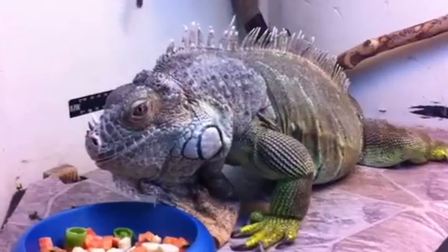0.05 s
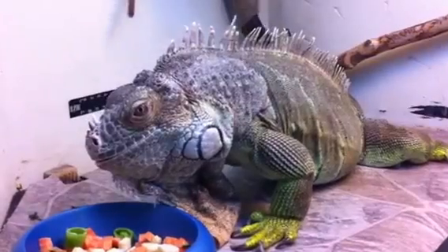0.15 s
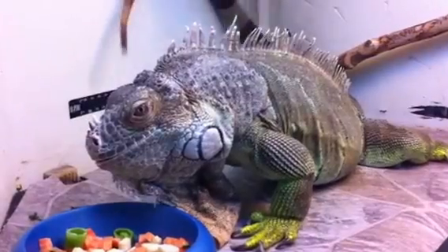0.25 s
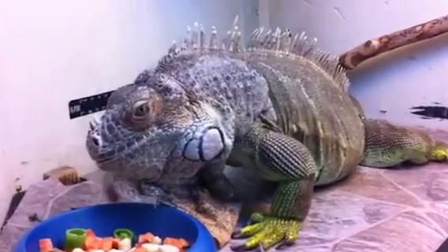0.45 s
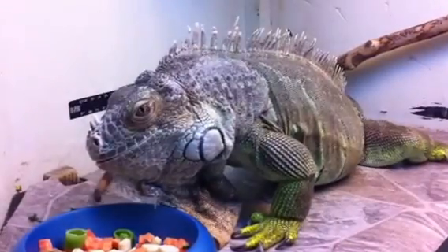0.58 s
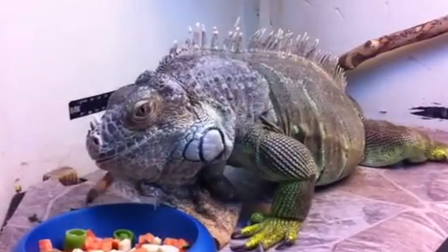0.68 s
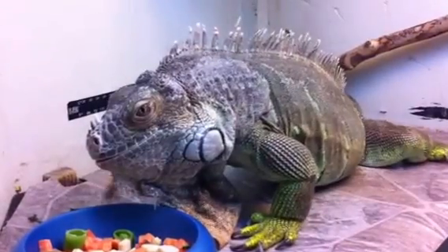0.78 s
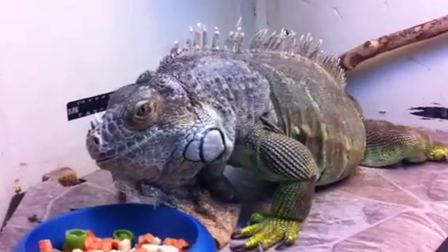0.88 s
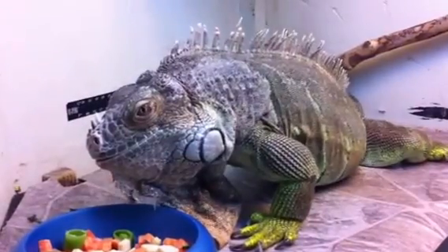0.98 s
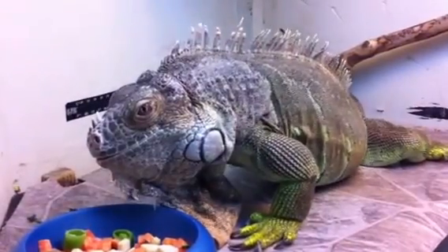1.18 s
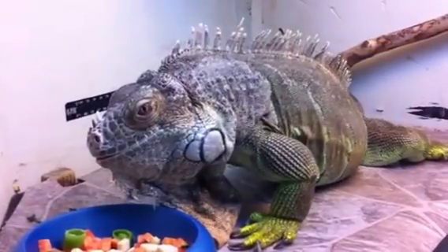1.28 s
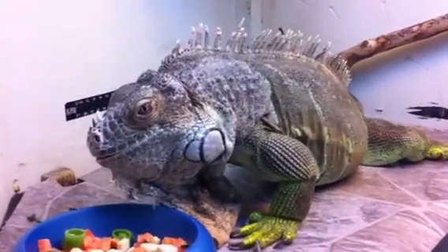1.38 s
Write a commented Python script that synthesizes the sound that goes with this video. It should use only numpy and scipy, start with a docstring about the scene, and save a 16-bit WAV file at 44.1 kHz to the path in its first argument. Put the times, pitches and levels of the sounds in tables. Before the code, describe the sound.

Close to the microphone, a reptile's tail scrapes down a wall panel with low bumps and a sharp click. Soft shuffling and a dull thud come afterwards, over a small room's low hum and slight hiss.

```python
"""A small room, one microphone close to an iguana's enclosure.
The scaly tail slides down the wall, faster and faster, snags a few times and stops. The scales rasp
as they stick and slip, and the wall panel rumbles and knocks under them. Faint shuffles and a padded
thud follow. Further off the room hums, and the microphone adds a little hiss."""
import sys
import numpy as np
from scipy import signal
from scipy.fft import rfft, irfft
from scipy.io import wavfile
from scipy.ndimage import uniform_filter1d

SR = 44100
rng = np.random.default_rng(int(sys.argv[2]) if len(sys.argv) > 2 else 0)


def persist_wave(psi):
    """Save psi, clipped to +-1, as 16-bit WAV."""
    counts = np.round(np.clip(psi, -1, 1) * 32767).astype(np.int16)
    wavfile.write(sys.argv[1], SR, np.atleast_2d(counts).T)


N = 63945
T = np.arange(N) / SR

# hum of the room: f/Hz, relative density/dB
HUM_SPECTRUM = [(25, -22), (60, -35), (100, -13), (130, 1), (200, -15), (290, 2.5), (400, -10.5), (520, -6),
                (700, -16), (1500, -19), (4000, -21.5), (9000, -22.5)]
# hiss of the microphone: f/Hz, relative density/dB
HISS_SPECTRUM = [(2000, -17.5), (7000, -17), (10500, -16.5), (12500, -9), (14300, -10), (15100, -0.5),
                 (15900, -10.5)]
# rasp of the tail on the wall: t/s, level/dB
RASP_LEVELS = [(.09, -71), (.17, -65), (.235, -55.5), (.34, -55.5), (.43, -52.5), (.51, -49), (.56, -45.5),
               (.595, -46.5), (.628, -47.5), (.672, -47.5), (.72, -56.5), (.79, -71.5)]
# rasp of the scales: f/Hz, relative density/dB
RASP_SPECTRUM = [(60, -11), (300, 6.5), (480, -24), (680, -0.5), (850, 3), (1500, -3), (2400, -2),
                 (3400, -3.5), (4400, -7), (7000, -11), (11000, -10), (15800, -19.5)]
# push of the tail on the panel: t/s, level/dB
PUSH_LEVELS = [(.15, -57), (.225, -52), (.29, -50), (.39, -46), (.465, -42), (.55, -39.5), (.585, -44),
               (.65, -35.5), (.69, -42.5), (.735, -68.5), (.82, -60)]
# modes of the wall panel, with two long-ringing room modes at 273 and 528 Hz: f/Hz, share rubbed high up/dB,
# share rubbed low down/dB, t60/s
PANEL_MODES = [(132.2, 4, -4.5, 0.78), (164.8, -6.5, -3, 0.19), (207.3, -1, -4.5, 0.15),
               (245.5, -5, -1, 0.32), (273, -15.5, -5.5, 0.56), (332.2, -2.5, -5, 0.17),
               (378.2, -7.5, -3, 0.18), (405.34, -2, -3.5, 0.43), (478.6, -14, -5, 0.14),
               (528, -17.5, -8, 0.3), (599, -15.5, -13, 0.043), (850, -35, -12, 0.016)]
# echo of the room: f/Hz, relative density/dB
ECHO_SPECTRUM = [(150, -5), (270, -1), (450, 0), (700, 14), (1000, 0.5), (1500, 4.5), (4000, -3),
                 (9000, -13)]
# tail and body bumping the panel: t/s, level/dB, f/Hz
PANEL_BUMPS = [(.225, -38, 132.5), (0.308, -36.5, 152), (0.369, -38.5, 134.3), (.386, -32.5, 134.6),
               (.449, -39.5, 398.6), (0.488, -35, 390.6), (.518, -34, 144), (.607, -37, 156.6),
               (.647, -37, 379), (.673, -28.5, 136), (0.705, -35.5, 136.4), (1.412, -53, 150)]
# scales catching on the wall: t/s, level/dB, decay/s, tilt/(dB per octave)
SCALE_SNAGS = [(0.5501, -44, 0.011, -3.5), (.6054, -40, 0.0067, 2.5), (0.6113, -43, 0.0069, -7),
               (0.6371, -40.5, 0.0088, -5), (0.6379, -36, 0.01, 0.7), (0.666, -47.5, 0.013, 5)]
# scratch of a snag or flick: f/Hz, relative density/dB
SCRATCH_SPECTRUM = [(80, -23), (350, -3), (900, 3.5), (1450, 7.5), (2100, 1.5), (3500, 1.5), (5000, -7),
                    (9000, -8), (15800, -16.5)]
# faint shuffles: peak t/s, rise/s, fall/s, rasp level/dB, push level/dB
SHUFFLE_SWELLS = [(.957, 0.021, 0.026, -61.5, -61), (1.013, 0.033, 0.042, -69, -65.5),
                  (1.097, 0.036, 0.058, -63, -62), (1.371, 0.032, 0.031, -63, -63.5),
                  (1.42, .013, 0.036, -65, -77)]
# rasp of the shuffles: f/Hz, relative density/dB
SHUFFLE_SPECTRUM = [(80, -12), (140, 21), (290, 2), (420, -16), (800, 4.5), (1300, -1.5), (2700, -4),
                    (3060, 2.5), (3500, -4.5), (7000, -9), (15800, -21)]
# body of the thud: f/Hz, relative density/dB
THUD_SPECTRUM = [(90, -20), (150, 3), (290, 1), (450, -18), (900, -13), (1400, -24.5), (5000, -32)]


def undb(db):
    """Decibels to gain."""
    return 10 ** (np.asarray(db) / 20)


def unit(x):
    """Scale to rms 1."""
    return x / np.sqrt(np.mean(x ** 2))


def fader(rows):
    """Gain from points of t/s, level/dB; silent outside them."""
    times, db = np.array(rows).T
    return undb(np.interp(T, times, db, left=-np.inf, right=-np.inf))


def colour(x, spectrum, tilt=0):
    """Shape by points of f/Hz, level/dB and a tilt in dB per octave; rms 1."""
    hz, db = np.array(spectrum).T
    octave = np.log2(np.maximum(np.fft.rfftfreq(N, 1 / SR), 1))
    gain = undb(np.interp(octave, np.log2(hz), db + tilt * np.log2(hz)))
    return unit(irfft(rfft(x) * gain, N))


def waver(rate_hz):
    """Glide between random values; rms 1."""
    hold = int(SR / rate_hz)
    steps = np.repeat(rng.standard_normal(N // hold + 1), hold)
    return unit(uniform_filter1d(steps, hold)[:N])


def die_away(t60):
    """A fade that loses 60 dB in t60 seconds."""
    return np.exp(-np.log(1000) * T / t60)


def resound(x, response):
    """Pass x through an impulse response scaled to unit energy."""
    return signal.fftconvolve(x, response / np.linalg.norm(response))[:N]


def low_cut(x, hz=130.3, order=8):
    """Roll off the bass, by default steeply below the panel's lowest mode."""
    return signal.sosfilt(signal.butter(order, hz, "high", fs=SR, output="sos"), x)


def background(hum_db=-61.5, waver_db=-0.47, hiss_db=-65.5):
    """The room's low, slightly wavering hum and the microphone's steady hiss."""
    hum = colour(rng.standard_normal(N), HUM_SPECTRUM) * undb(hum_db + waver_db * waver(rate_hz=11.06))
    hiss = undb(hiss_db) * colour(rng.standard_normal(N), HISS_SPECTRUM)
    return hum + hiss


def friction(ticks_per_s=3500, spread_db=2, rub_db=-1, judder_db=0.85):
    """Dense ticks of single scales over a smooth rub, juddering as they stick and slip."""
    catches = rng.random(N) < ticks_per_s / SR
    ticks = catches * undb(spread_db * rng.standard_normal(N)) * np.sign(rng.standard_normal(N))
    rub = undb(rub_db) * rng.standard_normal(N)
    judder = undb(judder_db * waver(rate_hz=110.9))
    return unit((unit(ticks) + rub) * judder)


def slide():
    """Close up, the tail rasps along the wall and shakes the panel."""
    rasp = colour(friction(), RASP_SPECTRUM) * fader(RASP_LEVELS)
    rumble = panel(friction() * fader(PUSH_LEVELS))
    return rasp + rumble


def enclosure(x, level_db=-5, t60=0.08, crossfades_per_s=6.3):
    """Short treble echoes between the walls; two patterns trade places as the contact moves."""
    tails = [low_cut(rng.standard_normal(N) * die_away(t60), hz=1000, order=3) for _ in range(2)]
    turn = np.pi / 2 * crossfades_per_s * T
    echoes = np.cos(turn) * resound(x, tails[0]) + np.sin(turn) * resound(x, tails[1])
    return x + undb(level_db) * echoes


def room(x, level_db=-20.5, t60=0.65):
    """The room's faint, dull echo, well behind the direct sound at the microphone."""
    tail = colour(rng.standard_normal(N), ECHO_SPECTRUM) * die_away(t60)
    return x + undb(level_db) * resound(x, tail)


def panel(force, descent_s=(0.43, 0.59)):
    """The wall panel rings in its modes, and the room in two of its own, whose shares shift as the contact
    moves down."""
    hz, high_db, low_db, t60 = np.array(PANEL_MODES).T[:, :, None]
    polarity = (-1) ** np.arange(len(PANEL_MODES))[:, None]
    modes = polarity / np.sqrt(t60) * die_away(t60) * np.sin(2 * np.pi * hz * T)  # equal energy each
    descent = np.interp(T, descent_s, [0, 1])
    high_up = resound(force * (1 - descent), np.sum(undb(high_db) * modes, axis=0))
    low_down = resound(force * descent, np.sum(undb(low_db) * modes, axis=0))
    return low_cut(high_up + low_down)


def bumps(attack_s=0.00035, decay_s=0.017):
    """Soft knocks against the panel, quickly damped by the body that lands on it."""
    knocks = np.zeros(N)
    for start, db, hz in PANEL_BUMPS:
        age = np.maximum(T - start, 0)
        envelope = (1 - np.exp(-age / attack_s)) * np.exp(-age / decay_s)
        knocks += undb(db) * envelope * np.sin(2 * np.pi * hz * age)
    return low_cut(knocks)


def snags():
    """Short scratches where scales catch and let go."""
    scratches = np.zeros(N)
    for start, db, decay, tilt in SCALE_SNAGS:
        envelope = (T >= start) * np.exp(-np.abs(T - start) / decay)
        scratches += undb(db) * envelope * colour(rng.standard_normal(N), SCRATCH_SPECTRUM, tilt)
    return low_cut(scratches)


def flick(start_s=0.6607, level_db=-33, decay_s=0.0019):
    """The tail tip flicks off the wall with one bright click."""
    envelope = (T >= start_s) * np.exp(-np.abs(T - start_s) / decay_s)
    scratch = colour(np.sign(rng.standard_normal(N)), SCRATCH_SPECTRUM, tilt=4)
    return undb(level_db) * envelope * scratch


def shuffles():
    """Light rubs that swell and fade as the animal settles."""
    rasp, push = np.zeros(N), np.zeros(N)
    for peak, rise, fall, rasp_db, push_db in SHUFFLE_SWELLS:
        width = np.where(T < peak, rise, fall)
        swell = np.exp(-0.5 * ((T - peak) / width) ** 2)
        rasp += undb(rasp_db) * swell
        push += undb(push_db) * swell
    return colour(friction(), SHUFFLE_SPECTRUM) * rasp + panel(friction() * push)


def thud(start_s=0.996, gain_db=-46, attack_s=0.012, decay_s=0.038):
    """One dull, padded contact with the floor."""
    age = np.maximum(T - start_s, 0)
    envelope = (1 - np.exp(-age / attack_s)) * np.exp(-age / decay_s)
    return undb(gain_db) * envelope * colour(rng.standard_normal(N), THUD_SPECTRUM)


def scene():
    """At the microphone, in mono: the iguana close by, the room behind it."""
    rubbing = enclosure(slide() + shuffles())
    iguana = rubbing + snags() + flick() + bumps() + thud()
    return (room(iguana) + background())[None]


def record(dry, top_hz=15800):
    """The recorder cuts the top treble steeply."""
    return signal.sosfilt(signal.ellip(12, 0.2, 70, top_hz, fs=SR, output="sos"), dry)


dry = scene()
out = record(dry)
persist_wave(out)
```